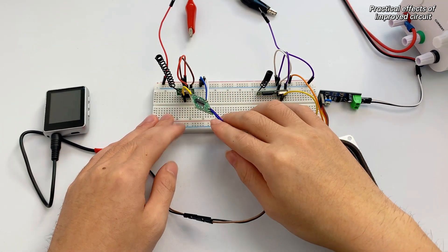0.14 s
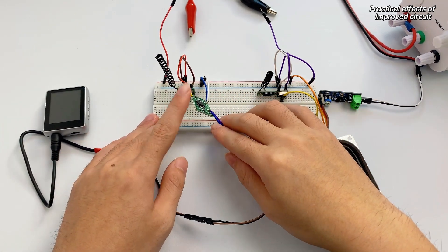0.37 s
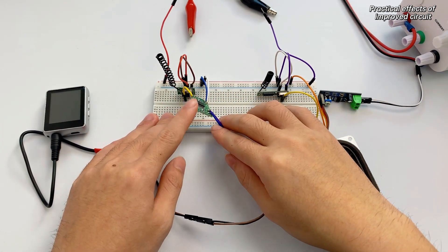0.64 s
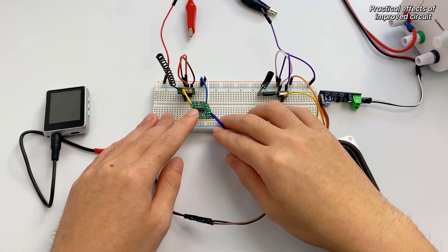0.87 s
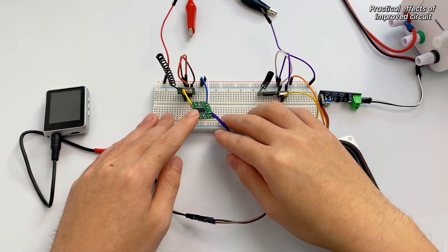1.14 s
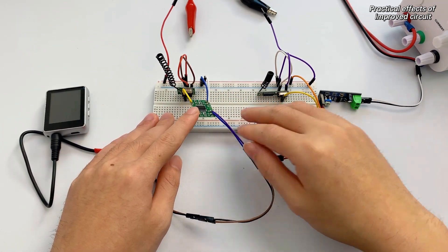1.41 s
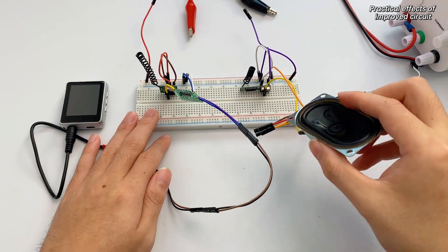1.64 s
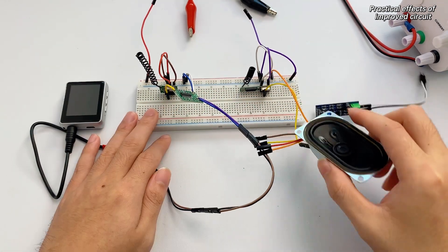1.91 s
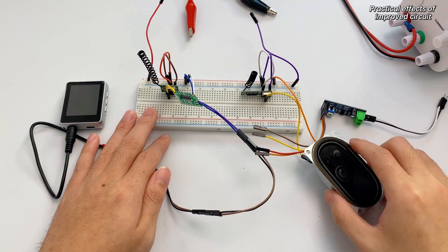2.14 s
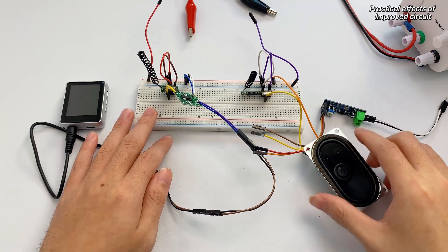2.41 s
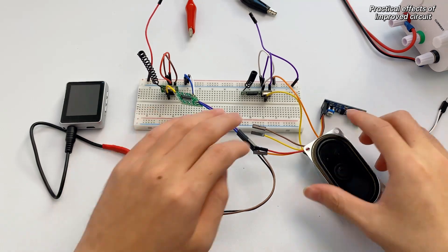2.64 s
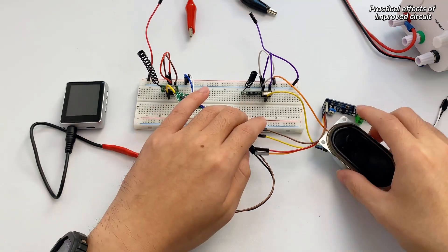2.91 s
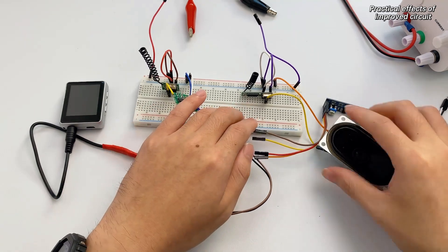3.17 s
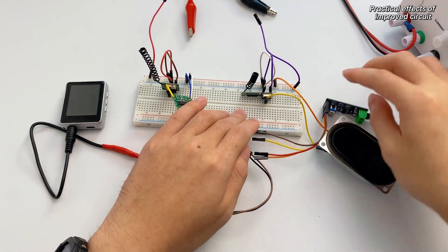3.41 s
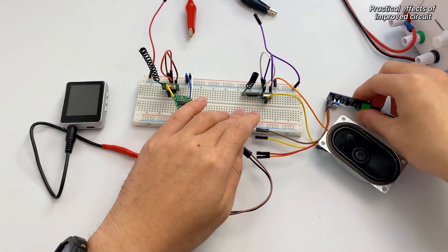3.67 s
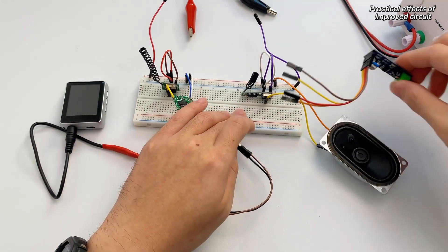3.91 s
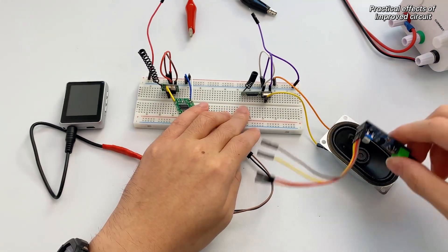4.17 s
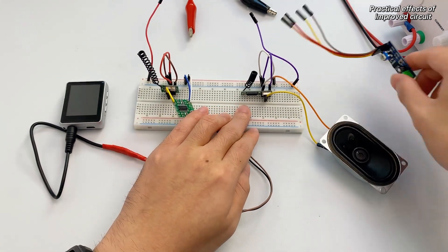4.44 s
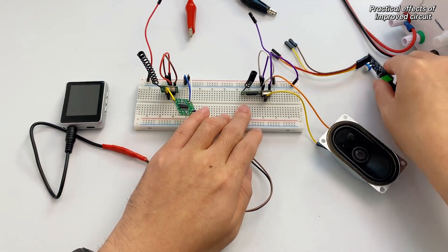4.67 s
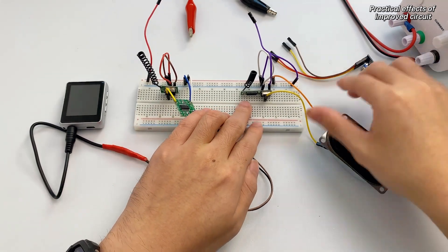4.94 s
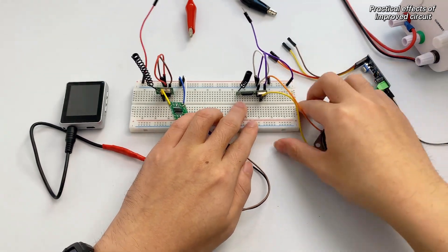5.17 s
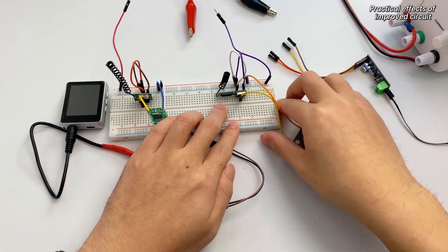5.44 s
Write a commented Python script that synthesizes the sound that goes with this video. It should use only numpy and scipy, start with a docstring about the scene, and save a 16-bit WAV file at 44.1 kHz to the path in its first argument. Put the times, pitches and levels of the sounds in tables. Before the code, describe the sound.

A quiet rumbling hum and steady air noise run throughout. After a nearly still start, wire ends tick and sleeves brush, a hard crack sounds at two seconds, and a solid knock just before three. Later come a gritty drag with light taps, a crisp clack near four and three quarters, a duller thump at five, and a trailing rustle. Close phone pickup, slightly live hard room.

```python
"""Steady air noise and a low rumbling hum near 60 Hz, a sine unsteady like narrow-band noise, lie under it all.
Very faint thin flickering tones sound in the first two seconds. From 1.4 s hands move jumper wires, a small
loudspeaker and a circuit module about a bench, close under a phone: skin and sleeves rustle as filtered grit,
taps ring decaying modes, a crack in hard parts and a thud in the bench; drags scrape the same bodies with clicks.
A hard room of fading noise bands rings after each; a last long scrape and rustle fade towards the end at 5.56 s."""
import sys
import numpy as np
from scipy import signal
from scipy.fft import rfft, irfft, next_fast_len
from scipy.io import wavfile
from scipy.ndimage import uniform_filter1d

SR = 44100
rng = np.random.default_rng(int(sys.argv[2]) if len(sys.argv) > 2 else 0)


def convert_level_to_amplitude(level_db):
    """Map a level in decibels to its linear amplitude factor."""
    exponent = np.asarray(level_db, float) / 20
    return 10 ** exponent


def master(y):
    """Save y as 16-bit WAV."""
    cut = np.clip(np.atleast_2d(y).T, -1, 1)
    pcm = np.round(cut * 32767)  # scale
    wavfile.write(sys.argv[1], SR, pcm.astype(np.int16))


N = 245195
T = np.arange(N) / SR
RING_SAMPLES = 8192  # room for one blow to ring out

# resonances of the hard parts: pitch_hz, relative level_db, t60_s
HARD_PARTS = [(1326, -1, 0.026), (1550, -27, 0.0081), (1883, 5.5, 0.0062), (2100, -1.5, 0.037),
              (2290, 7.5, 0.007), (2540, -7.5, 0.029), (2750, 1.5, 0.013), (2950, -4.5, 0.018),
              (3296, 2, 0.013), (3754, -10.5, 0.01), (3710, 1, 0.0097), (4340, 1, 0.0085), (4546, 0, 0.013),
              (5640, 7.5, 0.0014), (6880, -1, 0.0082), (7800, -2, 0.0055), (8300, -10, 0.0062),
              (9500, -9, 0.0084), (10400, -2.5, 0.0065), (11900, -10, 0.0082), (14400, -29, .004)]
# resonances of the bench top: pitch_hz, relative level_db, t60_s
BENCH_TOP = [(107, -5, 0.085), (145.7, 2, .1), (194.3, 3.5, 0.07), (310.4, 3.5, 0.039), (372.5, 0, 0.06),
             (429.7, 4, 0.037), (505.6, -3, 0.097), (590, -6, 0.12), (751, -4, 0.051), (936, 4, 0.025)]


def at(table, hz):
    """Read a (Hz, value) table on a log-frequency axis."""
    f, v = np.transpose(table)
    return np.interp(np.log(np.maximum(hz, 1)), np.log(f), v)


def colour(x, gain):
    """Multiply the spectrum by gain(Hz)."""
    size = next_fast_len(x.shape[-1], real=True)
    spectrum = rfft(x, size) * gain(np.fft.rfftfreq(size, 1 / SR))
    return irfft(spectrum, size)[..., :x.shape[-1]]


def unit(x):
    """Scale to rms 1."""
    return x / np.sqrt(np.mean(x ** 2))


def pan(x, db):
    """Share a sound between the ports; db is the first port's level over the second's."""
    return x * convert_level_to_amplitude(np.array([[db], [-db]]) / 2)


def walk(per_s):
    """Random levels held for 1 / per_s seconds and slewed twice, scaled to rms 1."""
    hold = int(SR / per_s)
    steps = np.repeat(rng.standard_normal(N // hold + 1), hold)
    return unit(uniform_filter1d(uniform_filter1d(steps, hold), hold)[:N])


def ring(modes, centre_hz, octaves, detune, phase):
    """Decaying modes, strongest near the centre that the blow favours."""
    hz, db, t60 = np.transpose(modes)[:, :, None]
    t = T[:min(RING_SAMPLES, int(1.5 * t60.max() * SR))]
    distance = np.log2(hz / centre_hz) / octaves
    weight = convert_level_to_amplitude(db - np.minimum(6 * distance ** 2, 20))
    decay = np.exp(-np.log(1000) * t / np.maximum(t60, 1e-3))
    sound = np.sum(weight * decay * np.sin(2 * np.pi * hz * detune * t + phase), axis=0)
    return np.pad(sound, (0, RING_SAMPLES - len(t)))


def taps():
    """Every blow rings parts and bench; the crack rises in a fraction of a ms, the bench takes a few ms to swing.
    Returns the sound at the two ports and the blander one that all directions together send into the room."""
    # things set down or bumped on the bench, levels before panning:
    # start_s, crack_peak_db, crack_centre_hz, thud_rms_db (first 14 ms), thud_centre_hz
    knocks = [(1.969, -18, 2780, -30.5, 533), (2.179, -33, 2750, -33, 358),
              (2.7039, -47.5, 2475, -42.5, 250), (2.747, -46, 2500, -42.5, 458),
              (2.759, -48, 2660, -43.5, 505), (2.774, -50.5, 2620, -40, 400),
              (2.927, -26, 2570, -24.5, 320), (3.5683, -43.5, 2100, -31.5, 199.8),
              (3.588, -53, 2190, -48.5, 549), (3.594, -43, 2190, -43.5, 441), (3.617, -38, 2160, -40, 460),
              (4.703, -46.5, 3200, -62, 603.5), (4.709, -57, 2500, -49.5, 603),
              (4.758, -21, 2550, -33.5, 670), (4.784, -26, 2100, -39.5, 380),
              (5.038, -34, 2283, -26.5, 233), (5.201, -45, 2100, -41, 360)]
    # wire ends and plugs clicking on hard parts, before panning: start_s, peak_db, centre_hz, spread_octaves
    ticks = [(1.72, -71, 9044, 0.99), (1.769, -57.5, 2250, 0.5), (2.097, -56, 1940, 0.86),
             (2.839, -60, 7070, 0.79), (3.686, -50, 10200, 0.33), (3.729, -44, 3160, 1.6),
             (3.767, -44.5, 2360, 1.3), (3.781, -51, 10600, 0.32), (4.608, -55, 9020, 0.59),
             (4.617, -42, 2487, 0.53), (4.761, -24, 2950, 1.357), (5.094, -43.5, 3680, 0.45)]
    blows = []
    for start, db, hz, thud_db, thud_hz in knocks:
        # a harder knock wakes a wider range of modes
        blows.append((start, db, hz, 0.3 + 0.022 * (db + 48), thud_db, thud_hz))
    for start, db, hz, octaves in ticks:
        # a tick passes only a little to the bench
        blows.append((start, db, hz, octaves, db - 21, 400))

    out = np.zeros((3, N + RING_SAMPLES))
    cut = len(HARD_PARTS)
    chance = rng.standard_normal((len(blows), 3, cut + len(BENCH_TOP), 1))
    snap = (1 - np.exp(-T[:RING_SAMPLES] / 0.000088)) ** 2
    swell = (1 - np.exp(-T[:RING_SAMPLES] / 0.0013)) ** 2
    # neighbouring modes in opposite phase leave no holes between them
    alternate = np.pi * np.arange(cut)[:, None]
    for (start, crack_db, crack_hz, spread, thud_db, thud_hz), (tune, turn, skew) in zip(blows, chance):
        crack_tune, crack_phase = 1 + 0.02 * tune[:cut], alternate + 0.3 * turn[:cut]
        thud_tune, thud_phase = 1 + 0.015 * tune[cut:], 0.6 * turn[cut:]
        # each mode radiates its own way, so the ports get it with different phases
        crack = snap * np.array([
            ring(HARD_PARTS, crack_hz, max(spread, 0.2), crack_tune, crack_phase + side * 0.5 * skew[:cut])
            for side in (1, -1, 0)])
        thud = swell * np.array([
            ring(BENCH_TOP, thud_hz, 0.9, thud_tune, thud_phase + side * 0.2 * skew[cut:])
            for side in (1, -1, 0)])
        # over all directions the peaks and holes average out to a smooth pulse of the same energy
        power = uniform_filter1d(np.mean(np.abs(rfft(crack)) ** 2, axis=0), size=120)
        crack[2] = np.roll(irfft(np.sqrt(power)), 64)
        crack = convert_level_to_amplitude(crack_db) * crack / np.abs(crack[:2]).max()
        thud = convert_level_to_amplitude(thud_db) * thud / np.sqrt(np.mean(thud[:, :600] ** 2))
        i = int(start * SR)
        out[:, i:i + RING_SAMPLES] += crack + thud
    return pan(out[:2, :N], -1.6), out[2, :N]


def grit(rate, spread_db):
    """Stick-slip: tiny uneven clicks at random moments, rate per second on average."""
    clicks = (rng.random(N) < rate / SR) * rng.standard_normal(N)
    return clicks * convert_level_to_amplitude(spread_db * rng.exponential(size=N))


def strokes(table):
    """Each stroke rises, drifts steadily in level, lets go; the hand's pressure is never even."""
    attack_share, release_s, uneven_db = 0.11, 0.015, 2.5  # attack as a share of the stroke
    gain = np.zeros((len(table[0]) - 3, N))
    for start, length, change_db, *levels_db in table:
        span = slice(int(start * SR), int((start + length + release_s) * SR))
        along = (T[span] - start) / length
        release = 1 + (1 - along) * length / release_s
        edge = np.clip(np.minimum(along / attack_share, release), 0, 1)
        gain[:, span] += edge * convert_level_to_amplitude(change_db * along + np.array(levels_db)[:, None])
    return gain * convert_level_to_amplitude(uneven_db * walk(40))


def slides():
    """Dragging drives the parts and the bench with grit; skin and sleeves add a fine rustle."""
    # parts dragged over the bench, levels at the start of the stroke, before unevenness and panning:
    # start_s, length_s, change_db (over the stroke), scrape_db, rumble_db
    drags = [(1.762, 0.085, -11, -65.5, -74), (1.85, 0.083, 7, -69.5, -65.5), (1.935, 0.03, 3, -45.5, -47),
             (2.03, .1, 4.5, -60.5, -53.5), (2.70, 0.026, -8, -61, -41), (2.74, 0.043, -3, -59.5, -42.5),
             (2.80, 0.12, -2.5, -73, -55.5), (3.575, 0.093, -16, -50.5, -34), (3.70, 0.064, -4, -81, -56),
             (4.70, 0.069, 4, -64.5, -57), (5.075, 0.12, -8, -61.5, -41), (5.19, 0.37, -12.5, -64.5, -44.5)]
    # skin and wire sleeves brushing, level at the start of the stroke, rms from 7 to 13 kHz, before unevenness:
    # start_s, length_s, change_db (over the stroke), rustle_db
    brushes = [(1.36, .27, 9.5, -87), (1.715, .015, -10.5, -74), (1.83, 0.095, 3.5, -76),
               (1.94, 0.032, 11, -70), (2.03, 0.054, -23, -70), (2.095, 0.015, -13.5, -64),
               (2.31, 0.033, 3, -92), (2.45, 0.016, -4, -86), (2.555, 0.16, -5, -75), (2.76, .025, 12, -86),
               (3.575, 0.098, -14, -68.5), (3.68, 0.02, -10.5, -72.5), (3.75, .035, -18, -67.5),
               (4.607, 0.015, -5, -64), (4.63, .06, -1, -80.5), (4.70, 0.038, -12, -67.5),
               (5.08, 0.1, -2, -83), (5.16, 0.36, -5.5, -73.5)]
    # tone of the rustle: pitch_hz, relative gain_db
    rustle_tone = [(1470, -35), (2500, -3.5), (4950, -1.5), (5740, -9.5), (6550, -4), (8600, -12),
                   (11100, -3.5), (13400, -22), (14500, -11.5), (16000, -10)]
    scrape_gain, rumble_gain = strokes(drags)
    rustle_gain = strokes(brushes)[0]
    # a light drag mostly wakes the loudspeaker frame near 2.3 kHz, ringing longer than after a tap
    longer = [(hz, db, 1.5 * t60) for hz, db, t60 in HARD_PARTS]
    frame = ring(longer, 2250, 0.2, 1, 0)
    top = ring(BENCH_TOP, 276, 1.22, 0.92, 0)
    frame = frame / np.sqrt(np.sum(frame ** 2))
    top = top / np.sqrt(np.sum(top ** 2))
    scrape = signal.fftconvolve(scrape_gain * unit(grit(2000, 1.8)), frame)[:N]
    rumble = signal.fftconvolve(rumble_gain * unit(grit(1200, 1.8)), top)[:N]
    fine_grit = np.array([grit(15000, 1.2), grit(15000, 1.2)])
    rustle = colour(fine_grit, lambda hz: convert_level_to_amplitude(at(rustle_tone, hz)))
    bright = colour(rustle, lambda hz: (hz > 7000) & (hz < 13000))
    return pan(scrape + rumble, -2.5) + rustle_gain * rustle / bright.std()


def room(source):
    """Diffuse tail: octave bands of noise, each fading at its own rate, partly different at each port."""
    # how long the room rings: pitch_hz, t60_s
    room_t60 = [(100, 1), (500, 0.15), (2000, 0.43), (5000, 0.52), (10000, 0.16)]
    # how loud the room rings: pitch_hz, level_db (reverberant over direct)
    room_level = [(100, -10), (500, -1.5), (2000, -0.5), (5000, 2), (10000, 0.5)]
    t = T[:SR // 2]
    common, left, right = rng.standard_normal((3, len(t)))
    # long waves reach both ports alike
    alike = colour(common, lambda f: 1 / np.hypot(1, f / 300))
    noise = alike + colour(np.array([left, right]), lambda f: f / np.hypot(300, f))
    tail = 0
    for hz in 90 * 2. ** np.arange(8):
        def octave_band(f):
            octaves_off = np.log2(np.maximum(f, 1) / hz)
            return np.cos(np.pi / 2 * np.clip(octaves_off, -1, 1)) ** 2

        fade = np.exp(-np.log(1000) * t / at(room_t60, hz)) * (1 - np.exp(-t / 0.005))
        fade = fade / np.sqrt(np.sum(fade ** 2))
        tail = tail + colour(noise, octave_band) * convert_level_to_amplitude(at(room_level, hz)) * fade
    return signal.fftconvolve(source[None], tail, axes=1)[:, :N]


def air():
    """Coloured noise in the air: the part that both ports share, and the part that is each port's own."""
    # tone of the air noise: pitch_hz, relative gain_db
    air_tone = [(15, -67), (25, -38), (29, 1.5), (40, -12.5), (64, -6.5), (92, -12), (170, -16), (223, -22),
                (326, -20), (439, -23), (531, -30), (1070, -22.5), (1330, -33.5), (4030, -60.5),
                (16000, -75)]
    # how alike the air noise is at the two ports: pitch_hz, likeness (0-1)
    air_alike = [(60, 0.9), (150, 0.96), (400, 0.44), (1000, 0.58), (3000, 0), (15000, 0.5)]
    # slow drift of the air noise, before panning: time_s, level_db (rms)
    air_level = [(0, -50), (1.3, -48.5), (2.4, -49.5), (4.3, -50.5), (5.56, -48.5)]
    noise = unit(colour(rng.standard_normal((3, N)), lambda hz: convert_level_to_amplitude(at(air_tone, hz))))
    shared, left, right = noise * convert_level_to_amplitude(np.interp(T, *np.transpose(air_level)))

    def likeness(hz):
        return np.clip(at(air_alike, hz), 0, 1)

    shared = colour(shared, lambda hz: np.sqrt(likeness(hz)))
    own = colour(np.array([left, right]), lambda hz: np.sqrt(1 - likeness(hz)))
    return shared, own


def hum():
    """Low rumbling hum near 60 Hz: a sine made as unsteady as narrow-band noise, swelling and sinking at random."""
    # irregular swells, before added flicker and panning: time_s, pitch_hz, level_db (rms)
    swells = [(0.0, 59.5, -54.5), (0.14, 60.4, -43.5), (0.22, 59.7, -58), (0.42, 60.9, -48),
              (0.62, 61.7, -68), (0.68, 62.8, -48), (0.79, 57.2, -50.5), (1.07, 59, -48),
              (1.28, 56.03, -54), (1.36, 57.7, -37), (1.42, 56.9, -53), (1.63, 58.4, -45),
              (1.72, 59.3, -71), (1.79, 59.5, -46.5), (2.26, 59.5, -55.5), (2.35, 64.5, -48),
              (2.69, 61.0, -63), (3.03, 61.8, -60), (3.16, 64.4, -65), (3.2, 63.37, -56),
              (4.1, 60.0, -48.5), (4.24, 67.7, -66), (4.32, 64.8, -49.5), (4.44, 60.88, -59),
              (4.78, 61.0, -50), (5.56, 62.1, -48.5)]
    throb_db, throb_per_s, waver_hz = 2.5, 11, 1
    s, hz, db = np.transpose(swells)
    level = np.sqrt(2) * convert_level_to_amplitude(np.interp(T, s, db) + throb_db * walk(throb_per_s))
    pitch = np.interp(T, s, hz) + waver_hz * walk(5)
    return level * np.sin(2 * np.pi * np.cumsum(pitch) / SR)


def background():
    """Air noise and hum fill the room; the shared part reaches the right port a little later and stronger."""
    pan_db, lag_s = -2.2, 0.00043
    shared, own = air()
    shared = shared + hum()
    late = np.interp(T - lag_s, T, shared)
    return pan(own + np.array([shared, late]), pan_db)


def flickering_tones():
    """Very faint thin flickering tones: sines with randomly wandering level and pitch."""
    # the tones before their flicker: start_s, length_s, pitch_hz, typical_db (level around which the flicker
    # swings)
    thin_tones = [(.42, 0.94, 2470, -88.5), (1.2, 0.384, 3090, -94)]
    out = 0
    for start, length, hz, db in thin_tones:
        fade = np.clip(np.minimum(T - start, start + length - T) / 0.044, 0, 1)
        level = fade * convert_level_to_amplitude(db + 7.3 * walk(14.76))
        pitch = hz * (1 + 0.003 * walk(10))
        out = out + level * np.sin(2 * np.pi * np.cumsum(pitch) / SR)
    return out


def scene():
    """Bench sounds, their room tail, the background and the faint tones."""
    blows, spread = taps()
    drags = slides()
    tail = room(spread + drags.mean(axis=0))
    return blows + drags + tail + background() + flickering_tones()


def band_limit(x):
    """A steep low-pass at the top of the band."""
    return signal.sosfilt(signal.butter(12, 16370, fs=SR, output="sos"), x)


def record(dry):
    """The microphone drops the deepest bass, below about 55 Hz."""
    bass_cut = signal.butter(3, 55, "high", fs=SR, output="sos")
    mix = signal.sosfilt(bass_cut, dry)
    return band_limit(mix)


dry = scene()
out = record(dry)
master(out)
```